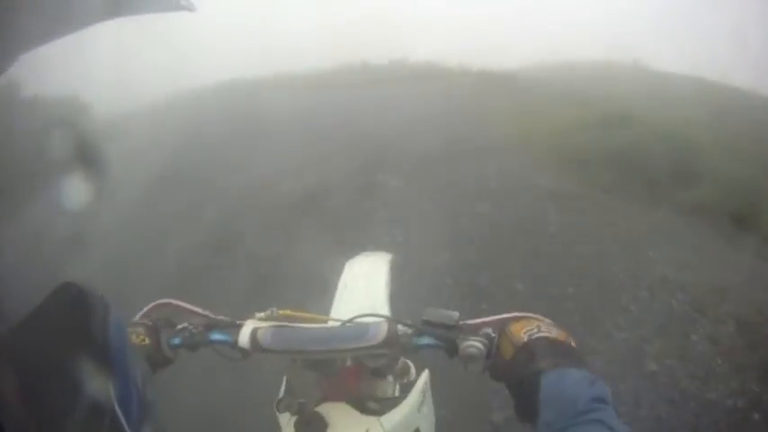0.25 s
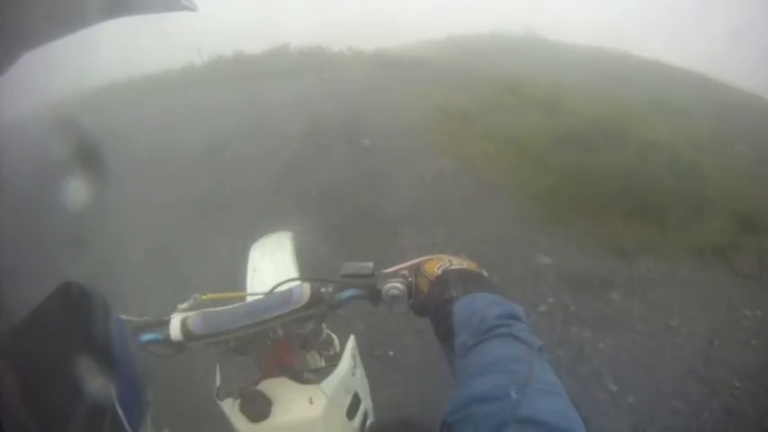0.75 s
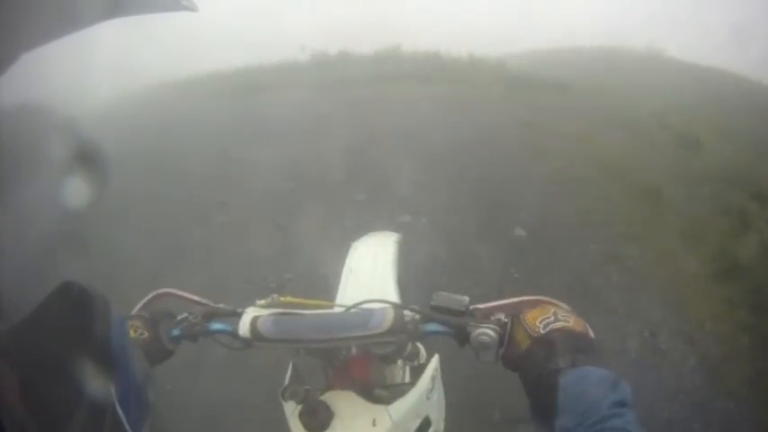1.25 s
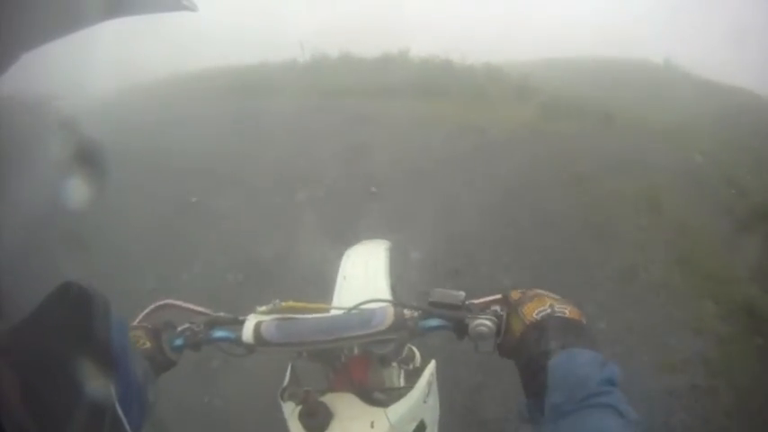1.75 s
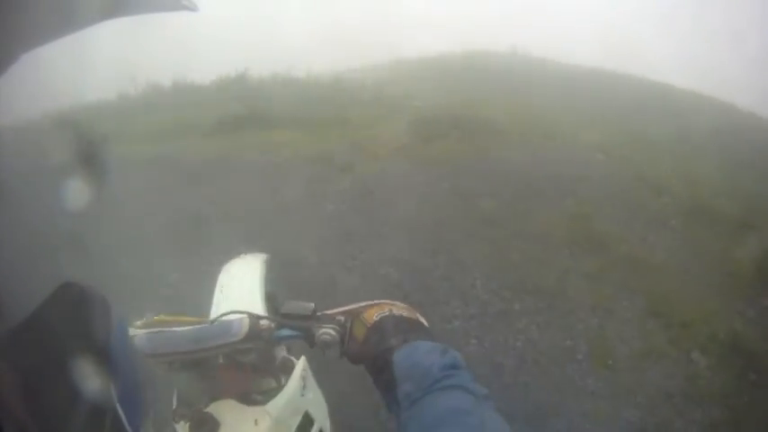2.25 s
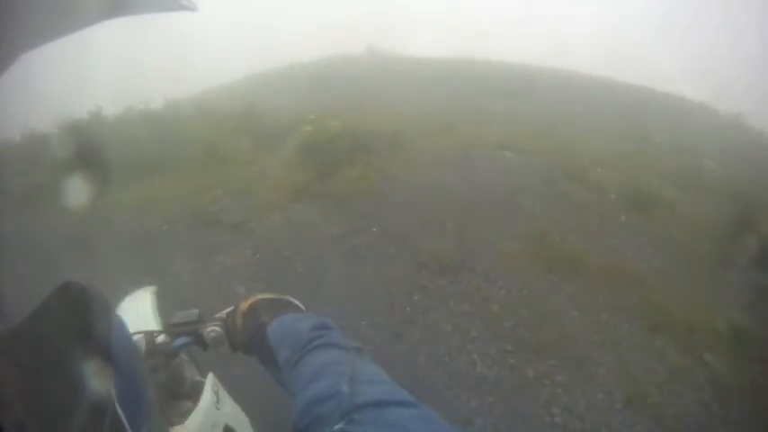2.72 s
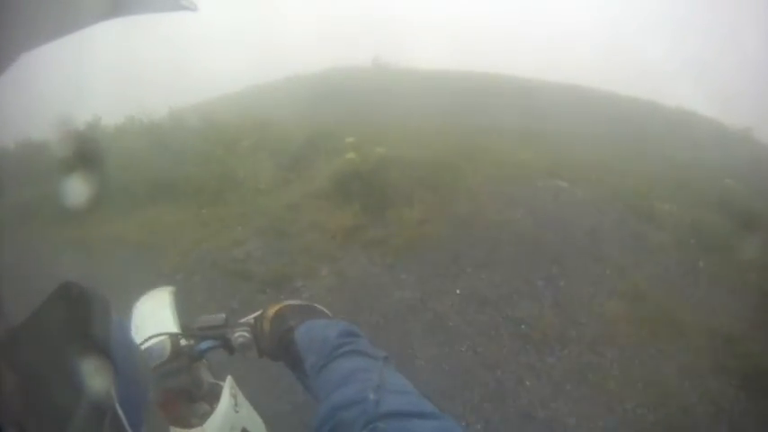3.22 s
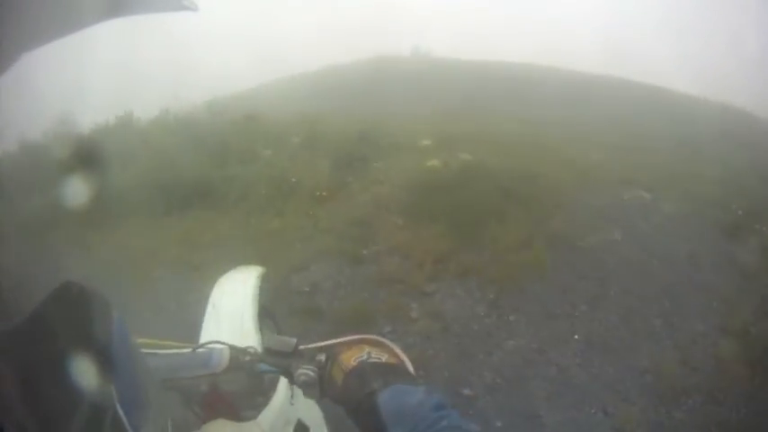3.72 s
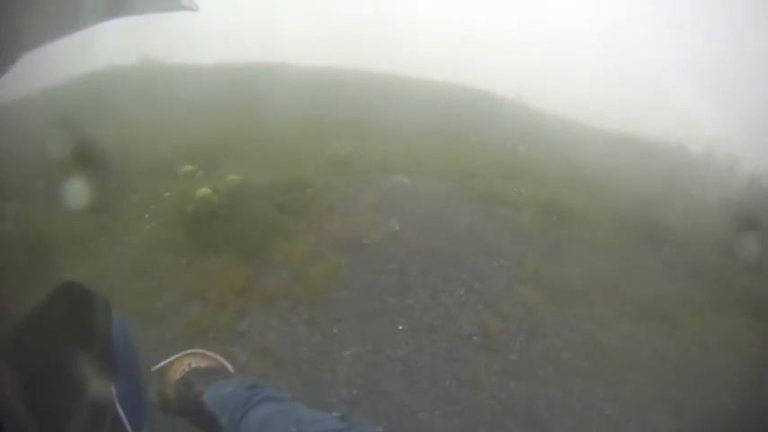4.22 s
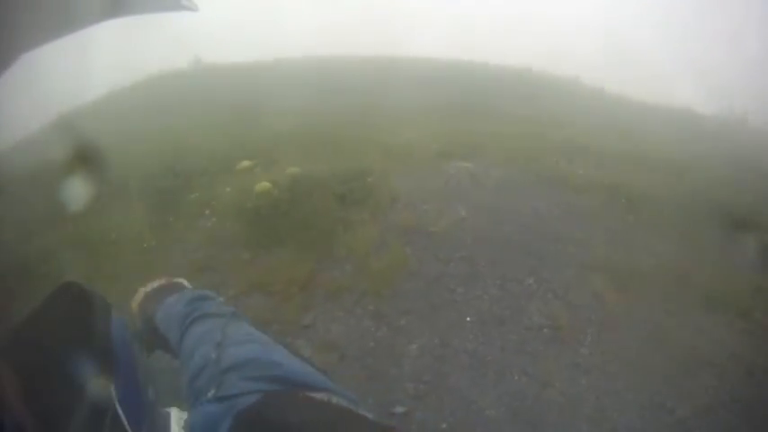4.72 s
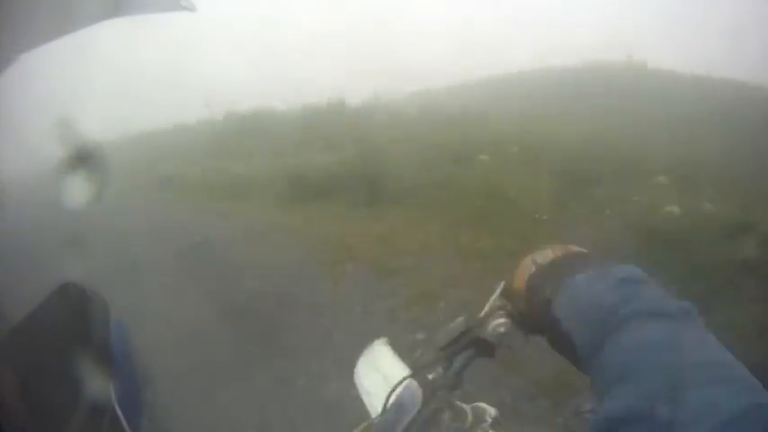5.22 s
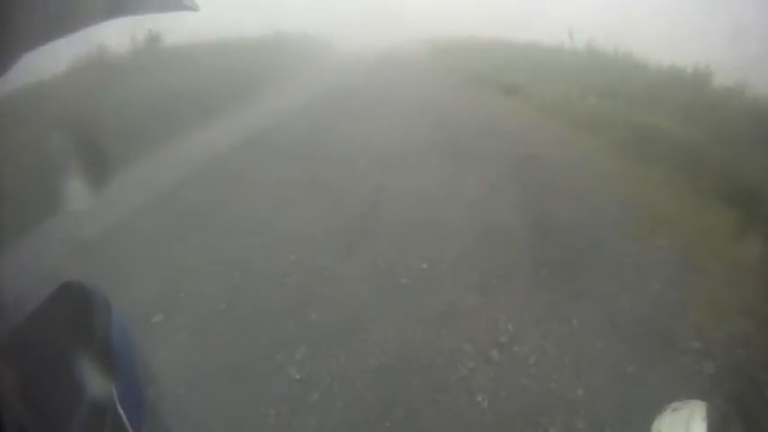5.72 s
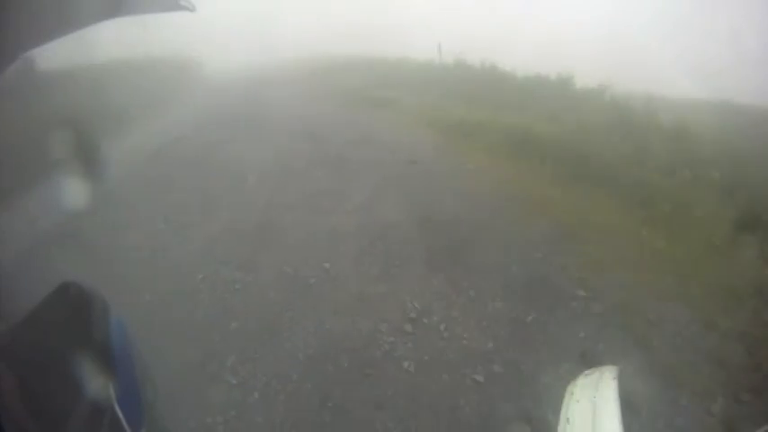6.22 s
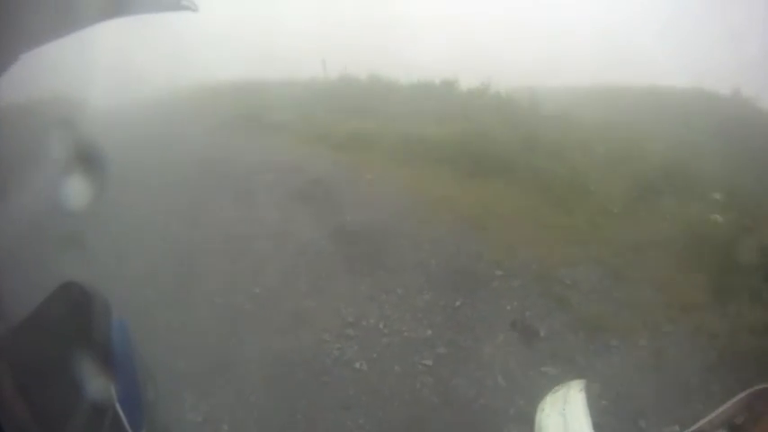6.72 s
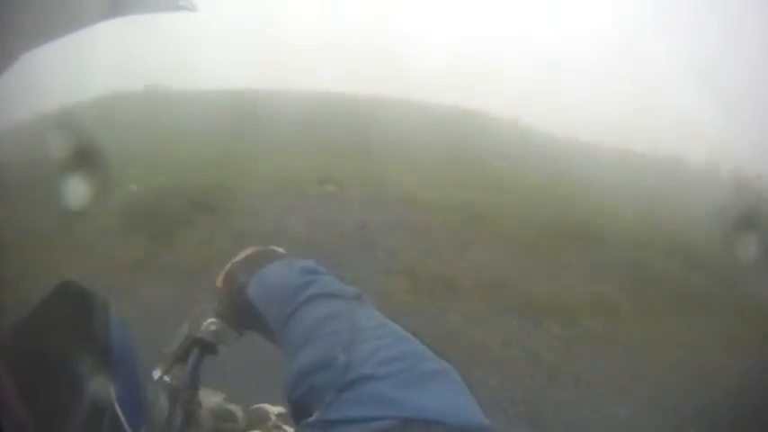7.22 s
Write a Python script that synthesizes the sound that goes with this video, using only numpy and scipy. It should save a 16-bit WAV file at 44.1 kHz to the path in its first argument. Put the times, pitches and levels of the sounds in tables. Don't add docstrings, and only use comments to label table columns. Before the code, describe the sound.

A single-cylinder off-road motorcycle coasts outdoors, close but boxed-in and mid-heavy. Its buzzing pipe falls in pitch amid metallic chatter and scattered bangs, then a crisp blip, a long slowdown, a gassier blip, coughing in the pipe, and a last hissy blip. Occasional stones clack sharply on the camera housing over low wind and slight hiss.

```python
import sys
import numpy as np
from scipy import signal
from scipy.fft import rfft, irfft
from scipy.io import wavfile
from scipy.ndimage import uniform_filter1d

SR = 44100
rng = np.random.default_rng(int(sys.argv[2]) if len(sys.argv) > 2 else 0)


def generate_wav(sig):
    pcm = np.round(np.clip(np.atleast_2d(sig).T, -1, 1) * 32767).astype(np.int16)
    wavfile.write(sys.argv[1], SR, pcm)


def elevation(decibels):
    levels = np.asarray(decibels, float)
    return 10 ** (levels / 20)


N = 328986
t = np.arange(N) / SR

# (time [s], speed [turns/s])
CRANK_SPEED = [(0.048, 73.23), (0.81, 52.22), (1.038, 51.48), (1.319, 55.11), (1.95, 47.84), (2.519, 44.65),
               (2.661, 84.56), (2.709, 89.3), (2.99, 71.68), (3.989, 45.7), (4.939, 37.35), (5.36, 37.79),
               (5.52, 75), (5.69, 65.44), (6.77, 41.14), (6.93, 70.6), (6.969, 73.9), (7.46, 56.22)]
# (time [s], peak level [dB], gas burst level [dB])
LONE_FIRINGS = [(0.115, -30, -47), (0.86, -32, -52), (0.939, -29.5, -44), (1.0357, -31.5, -50),
                (1.054, -30, -50), (1.0934, -27.5, -45.5), (1.2037, -30.5, -46), (1.276, -24.5, -43.5),
                (1.5848, -30.5, -43.5), (1.74, -48.5, -50.5), (1.9824, -32, -46.5), (2.2238, -26.5, -43),
                (2.329, -34.5, -52.5), (2.416, -27, -47.5), (3.474, -21.5, -42.5), (3.669, -28, -48.5),
                (4.0121, -22, -41.5), (4.141, -33, -59), (4.2065, -28.5, -52), (4.3424, -23.5, -48),
                (4.4571, -29, -60), (4.5528, -30, -66), (4.576, -34, -71), (4.7018, -30.5, -60),
                (4.8533, -32, -72), (4.956, -31.5, -61), (5.0973, -29.5, -51), (5.237, -28.5, -43),
                (5.5285, -21.5, -68), (6.5693, -30.5, -44.5)]
# (first firing [s], last firing [s], firing rate [Hz], rate gain [Hz/s])
BLIP_TIMES = [
    (2.5263, 2.66, 42, 325),
    (5.3498, 5.5, 35, 300),
    (6.7822, 6.915, 38.5, 265),
]
# (first firing [dB], last firing [dB], gas burst [dB], roar [dB], intake hiss [dB])
BLIP_LEVELS = [
    (-25, -21, -22, 12.5, 9),
    (-28.5, -27, -11, 14, 6),
    (-32, -27.5, -9.5, 13, 13),
]
BLIP_CASE_RING_DB = [-0.5, -23, -17]
# (time [s], peak level [dB])
COUGHS = [(6.239, -43), (6.259, -43.5), (6.298, -65), (6.383, -40), (6.402, -42), (6.467, -46),
          (6.511, -40.5), (6.577, -44), (6.67, -37.5), (6.767, -43)]
# (time [s], level [dB])
GRIP = [(0, -62.5), (.4, -59.5), (1.3, -57), (1.8, -51), (2.5, -52.5), (2.72, -64.5), (3.0, -56.5),
        (3.3, -54), (3.83, -55), (3.9, -65.5), (4.45, -60.5), (5.6, -73), (6.4, -53.5), (6.54, -46),
        (6.6, -72), (7.3, -74), (7.46, -56)]
# (time [s], effort [dB])
EFFORT = [(0, 2.5), (.27, 0), (.5, 1.5), (1.05, -2), (1.41, 2.5), (2.2, 0.5), (2.5, -4), (2.75, -2.5),
          (3.32, -2), (3.9, -3.5), (4.4, -5.5), (5.07, -1), (5.25, -3.5), (5.58, 4.5), (5.85, 0.5),
          (6.6, 3.5), (7.1, 0), (7.46, -0.5)]
# (level at 55 turns/s [dB], slope [dB/octave of speed], share of effort [0-1], share of roar [0-1])
LAYERS = [(-39.5, 5, 1, 1), (-52.5, 12, 0.067, 0.19), (-64.5, 6.5, .9, 0.13), (-65.5, 14.5, 0.65, 1)]
# (start [s], end [s], centre [Hz], width [Hz], level [dB])
FIN_SONGS = [(2.632, 2.696, 3880, 200.7, -45.5), (5.41, 5.521, 4073, 70.6, -51),
             (5.444, 5.677, 3086, 90.7, -52.5), (6.885, 6.952, 4090, 79.9, -48),
             (6.901, 7.061, 2500, 200, -50), (1.729, 1.813, 9150, 59.8, -70), (1.84, 1.875, 9150, 60, -63),
             (2.71, 2.77, 9150, 60, -69), (2.944, 2.986, 9150, 60.4, -63), (3.028, 3.1, 9150, 58.65, -65)]
# (centre [Hz], width [Hz], level [dB])
CASE = [(1020, 310, 0.5), (1296, 50, 8), (1404.4, 188, 9.5), (1700, 140, -2), (2216, 208, -9),
        (2480, 55, -18.5), (3230, 120, -18.5), (3970, 230, -26), (4090, 200, -25), (5400, 270, -35),
        (5920, 130, -26)]
# (centre [Hz], width [Hz], level [dB])
PIPE = [(149, 45, -38), (264.3, 61, -3.5), (398.5, 55.5, 7), (475.6, 33.7, 5), (557.6, 5.5, 4),
        (795, 207, -1.5), (947, 85, 1)]
# (centre [Hz], width [Hz], level [dB])
SILENCER = [(247, 102, 0)]
# (centre [Hz], width [Hz], level [dB])
FINS = [(5600, 500, -24.5), (7200, 620, 0.5), (8250, 790, 7), (9200, 230, 2), (9160, 560, -8),
        (10090, 1060, 4.5), (12500, 3000, -10)]
# (centre [Hz], width [Hz], level [dB])
HEAD = [(3106, 180, 7.6), (3760, 100, 7.9), (4090, 120, 9)]
# (centre [Hz], width [Hz], level [dB])
BANG = [(258, 120, -35), (375, 32, 0.5), (497, 18, -39), (767, 39, -1), (926, 100, -5.5), (1389, 206, -0.5),
        (1432, 330, -25), (1748, 114, 1), (2205, 177, -0.5), (2500, 46, -14), (3400, 750, -23),
        (4100, 140, -22), (5960, 100, -40)]
# (centre [Hz], width [Hz], level [dB])
THROAT = [(250, 64, -5), (396, 80, -6.5), (536, 37, 2.5), (840, 290, -8), (920, 114, 4.5)]
# (time [s], share [0-1])
HEAD_TURN = [
    (0, 0),
    (5.2, 0),
    (5.4, 1),
    (6.85, 1),
    (7.05, 0),
    (7.46, 0),
]
# (centre [Hz], width [Hz], gain [ratio])
HELMET_SHADE = [(192, 200, -0.13), (323, 92, 1), (572, 87, 1), (718, 186, -0.89), (1210, 29, 1),
                (2510, 620, 0.39)]
# (time [s], peak level [dB], crack level [dB])
STONES = [
    (1.2487, -15.5, -28),
    (1.9468, -14.5, -26),
    (4.1711, -10.5, -25),
    (5.892, -16, -29.5),
]
# (frequency [Hz], level [dB], decay length [s])
STONE_MODES = [(171, -37, 0.015), (563, -35.5, 0.017), (940, -10.5, 0.002), (1341, 8, 0.0032),
               (2440, -15.5, 0.0078), (3146, -15, 0.0045), (3680, 8.5, 0.0013), (5420, 2.5, 0.0012),
               (6280, -7.5, 0.0017)]
# (time [s], level [dB], frequency [Hz], length [s])
THUMPS = [(5.7, -38, 30, .075), (5.745, -50, 190, .03), (6.53, -42, 36, .06), (6.47, -52, 25, .05),
          (7.25, -52, 130, .03), (7.35, -52, 30, .06), (3.92, -54, 30, .08), (5.32, -52, 30, .08)]
# (frequency [Hz], level [dB])
MIC_HISS = [(20, 7), (100, 4), (700, 2), (2000, 3), (6000, 0), (12000, -2), (15400, -5)]


def level(x, db):
    return x * elevation(db) / np.sqrt(np.mean(x ** 2))


def noise():
    return rng.standard_normal(N)


def curves(table):
    time_s, *columns = np.transpose(table)
    return [np.interp(t, time_s, column) for column in columns]


def clicks(times_s, db):
    x = np.zeros(N)
    at = np.clip((np.asarray(times_s) * SR).astype(int), 0, N - 1)
    np.add.at(x, at, elevation(np.asarray(db)))
    return x


def fade(x, t60_s):
    return signal.lfilter([1], [1, -np.exp(-np.log(1000) / (t60_s * SR))], x)


def peak(x, hz, width_hz):
    return signal.lfilter(*signal.iirpeak(hz, hz / width_hz, fs=SR), x)


def body(x, peaks, skirt_db, size=4096):
    bins_hz = np.arange(size // 2 + 1) * SR / size
    power = elevation(2 * skirt_db) / (1 + (bins_hz / 7000) ** 4)
    for hz, width_hz, db in peaks:
        power = power + elevation(2 * db) / (1 + (2 * (bins_hz - hz) / width_hz) ** 2) ** 1.812
    cepstrum = irfft(np.log(power) / 2)
    cepstrum[1:size // 2] *= 2
    cepstrum[size // 2 + 1:] = 0
    ring = irfft(np.exp(rfft(cepstrum)))[:size // 2]
    return signal.oaconvolve(x, ring / np.abs(ring).max())[:N]


def walk(rate_hz):
    hold = int(SR / rate_hz)
    steps = np.repeat(rng.standard_normal(N // hold + 1), hold)
    return 4.1 * uniform_filter1d(steps, hold)[:N]


def stepped(x):
    return .3 * x + .45 * np.roll(x, 32) + .4 * np.roll(x, 64) + .2 * np.roll(x, 96)


def crank():
    time_s, hz = np.transpose(CRANK_SPEED)
    rising_hz = np.interp(t, time_s, hz)
    coasting_hz = 1 / np.interp(t, time_s, 1 / hz)
    speed_hz = np.where(np.gradient(rising_hz) > 0, rising_hz, coasting_hz)
    speed_hz = speed_hz * (1 + .009 * walk(rate_hz=14) * (50 / speed_hz) ** 3.5)
    times_s, peak_db, _ = np.transpose(LONE_FIRINGS)
    kick_hz, kick_rise_s = 2.5, 0.045
    kicks = fade(clicks(times_s, peak_db + 28), t60_s=.9)
    return speed_hz + kick_hz * uniform_filter1d(kicks, int(kick_rise_s * SR))


def throttle(column):
    peak_share, release_s = 0.48, 0.065
    lift_db = 0
    for (first, last, *_), row in zip(BLIP_TIMES, BLIP_LEVELS):
        corners_s = [first, first + peak_share * (last - first), last + release_s]
        lift_db = lift_db + np.interp(t, corners_s, [0, row[column], 0])
    return lift_db


def pipe_hum(hz, port):
    scatter = rng.standard_normal(len(port))
    puffs = clicks(port / SR, .6 * scatter)
    hum = level(body(puffs, PIPE, skirt_db=-52), 0)
    tilt = 0.49 * peak(hum, 423, 80) - 0.45 * peak(hum, 403, 70) - .5 * peak(hum, 248, 210)
    hum = hum + np.clip((hz - 52) / 30, -.6, 1) * tilt
    upper_partials = peak(peak(puffs, 980, 700), 980, 700)
    hum = hum + level(upper_partials, -3) * np.minimum(hz / 70, 1.1) ** 3
    turbulence = body(noise(), PIPE, skirt_db=-24)
    hum = hum + level(turbulence, -10) * (50 / hz) ** 4
    boom = body(clicks(port / SR, 1.8 * scatter), SILENCER, skirt_db=-34)
    return hum + level(boom, -9.5) * (50 / hz) ** 4.35


def piston_slap(turns):
    stroke = 2 * turns + .3
    count = stroke.astype(int)
    strength_db = 5.1 * rng.standard_normal(count[-1] + 1)[count] - count % 2
    return np.exp(-(stroke % 1) / 0.12) * elevation(strength_db)


def clatter(hz, turns, port, slap):
    rattle = level(body(noise() * (2.2 + slap), CASE, skirt_db=-67), 0)
    rattle = signal.sosfilt(signal.butter(3, 1080, "highpass", fs=SR, output="sos"), rattle)
    rattle = rattle - .6 * peak(rattle, 1020, 330) * np.clip((hz - 50) / 20, 0, 1)
    coast = np.prod([(t < first) | (t > last) for first, last, *_ in BLIP_TIMES], axis=0)
    rattle = rattle * (.6 + .4 * uniform_filter1d(1. * coast, size=400)) * np.minimum(55 / hz, 1)
    closing = np.flatnonzero(np.diff(np.floor(turns + .57)))
    raps = clicks(port / SR, rng.standard_normal(len(port)))
    raps = raps + clicks(closing / SR, rng.standard_normal(len(closing)) - 3)
    ring = level(body(stepped(raps * coast), CASE, skirt_db=-50), -3)
    rattle = rattle + ring * np.minimum(hz / 62, 1.15) ** 2
    return rattle + 0.49 * (hz / 65) ** 5.9 * peak(rattle, 2120, 750)


def coasting():
    hz = crank()
    turns = np.cumsum(hz) / SR
    port = np.flatnonzero(np.diff(np.floor(turns)))
    slap = piston_slap(turns)
    octaves, effort_db, roar_db = np.log2(hz / 55), curves(EFFORT)[0], throttle(column=3)
    clatter_db, hum_db, gas_db, head_db = (db + slope * octaves + shaken * effort_db + roared * roar_db
                                           for db, slope, shaken, roared in LAYERS)
    shut = clicks([0] + [last for _, last, *_ in BLIP_TIMES], 0)
    gas_db = gas_db + throttle(column=4) + 2 * fade(shut, t60_s=1)
    shake_db = np.minimum(curves(GRIP)[0], -50.5)
    shake = np.sqrt(2) * elevation(shake_db) * np.sin(2 * np.pi * turns)
    gas = level(body(noise() * (1.1 + slap) * elevation(.6 * walk(rate_hz=25)), FINS, skirt_db=2), 0)
    head = level(body(noise() * (0.29 + slap), HEAD, skirt_db=-54), -2.5)
    rasp = level(peak(noise() * (0.94 + slap), 2260, 1400), -50)
    rasp = rasp * uniform_filter1d(fade(shut, t60_s=1.17), size=800)
    engine = rasp + shake + elevation(hum_db) * pipe_hum(hz, port)
    engine = engine + elevation(clatter_db - 2) * clatter(hz, turns, port, slap)
    return engine + elevation(gas_db) * gas + elevation(head_db) * head


def firings():
    times_s, peak_db, gas_db = map(list, np.transpose(LONE_FIRINGS))
    rings, delay_s = 0, .0004
    for timing, levels, ring_db in zip(BLIP_TIMES, BLIP_LEVELS, BLIP_CASE_RING_DB):
        first, last, hz, gain = timing
        first_db, last_db, burst_db, *_ = levels
        length_s = last - first
        turn = np.arange(0, hz * length_s + gain * length_s ** 2 / 2)
        after_s = (np.sqrt(hz ** 2 + 2 * gain * turn) - hz) / gain
        db = first_db + (last_db - first_db) * after_s / length_s
        db = db + 1.2 * rng.standard_normal(len(turn))
        late = np.clip((t - first) / .07, 0, 1)
        rings = rings + clicks(first + after_s + delay_s, db + ring_db) * late
        times_s += list(first + after_s)
        peak_db += list(db)
        gas_db += list(db + burst_db)
    blow = clicks(np.array(times_s) + delay_s, peak_db)
    ragged = stepped(blow) + .04 * noise() * fade(blow, t60_s=.03)
    bang = 2.25 * body(ragged, BANG, skirt_db=-49)
    bang = bang + .3 * body(blow, THROAT, skirt_db=-30)
    bang = bang + body(stepped(rings), CASE, skirt_db=-41)
    bang = bang + 0.96 * body(clicks(*np.transpose(COUGHS)), PIPE, skirt_db=-51)
    times_s += [s for s, _ in COUGHS]
    gas_db += [db - 6 for _, db in COUGHS]
    puffs = fade(clicks(np.array(times_s) + 0.0017, gas_db), t60_s=0.1)
    burst = noise() * uniform_filter1d(puffs, size=130)
    return bang + 0.34 * body(burst, FINS, skirt_db=0)


def fins():
    song = 0
    for start, end, hz, width_hz, db in FIN_SONGS:
        buzz = level(peak(peak(noise(), hz, width_hz), hz, width_hz), db)
        song = song + buzz * np.clip(np.minimum(t - start, end - t) / 0.016, 0, 1)
    return song


def knocks():
    age, out = t[:1500], np.zeros(N + 1500)
    swell = 1 - np.exp(-(age / .002) ** 2)
    for s, db, crack_db in STONES:
        ring = 0
        for hz, mode_db, length_s in STONE_MODES:
            gain = elevation(mode_db + (crack_db + 21) * (hz > 2000))
            tone = np.sin(2 * np.pi * hz * age + rng.uniform(0, 2 * np.pi))
            ring = ring + gain * tone * np.exp(-(age / length_s) ** 1.57)
        grit = body(noise()[:len(age)], [(4500, 3000, 0)], skirt_db=-25)[:len(age)]
        crack = elevation(crack_db + 5) * grit * np.exp(-age / .0025)
        start = int((s - .0012) * SR)
        out[start:start + len(age)] += 1.074 * elevation(db) * swell * (ring + crack)
    out = out[:N]
    return out + .05 * np.roll(out, int(.0105 * SR))


def wind():
    thumps = 0
    for s, db, hz, length_s in THUMPS:
        swell = np.exp(-((t - s) / (length_s / 2)) ** 2)
        thumps = thumps + elevation(db) * swell * np.sin(2 * np.pi * hz * (t - s))
    low = signal.butter(2, [18, 45], "bandpass", fs=SR, output="sos")
    rumble = signal.sosfilt(low, noise()) * elevation(2.6 * walk(rate_hz=1.54))
    hz, db = np.transpose(MIC_HISS)
    bins_hz = np.maximum(np.arange(N // 2 + 1) * SR / N, 1)
    hiss = irfft(rfft(noise()) * elevation(np.interp(np.log(bins_hz), np.log(hz), db)), N)
    return thumps + level(rumble, -63.5) + level(hiss, -66)


def scene():
    engine = coasting() + firings() + fins()
    shade = sum(gain * peak(engine, hz, width_hz) for hz, width_hz, gain in HELMET_SHADE)
    return (engine + curves(HEAD_TURN)[0] * shade + knocks() + wind())[None]


def band_limit(x):
    return signal.sosfilt(signal.butter(12, 15390, fs=SR, output="sos"), x)


def record(dry):
    hollow = dry - peak(dry, hz=681, width_hz=24)
    top_cut = signal.ellip(8, .2, 70, 15350, fs=SR, output="sos")
    mix = signal.sosfilt(top_cut, hollow)
    return band_limit(mix)


dry = scene()
out = record(dry)
generate_wav(out)
```